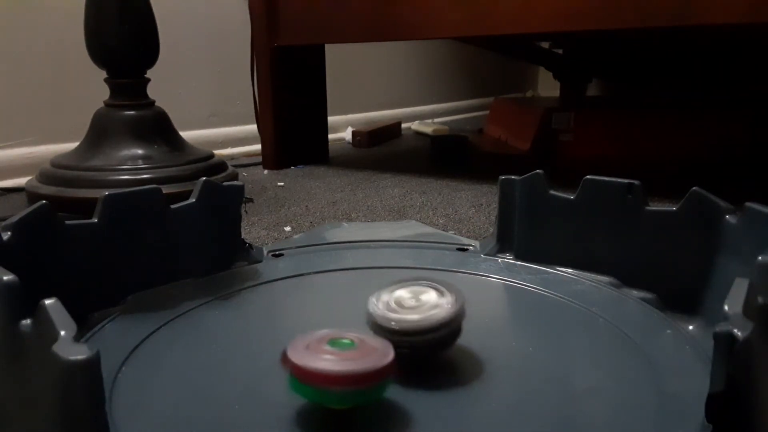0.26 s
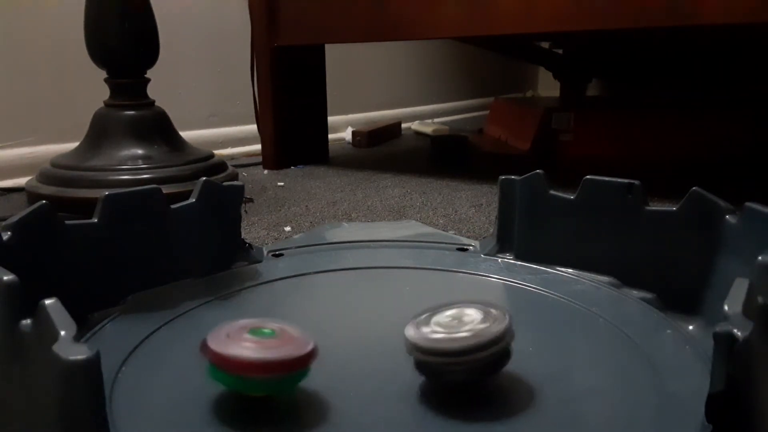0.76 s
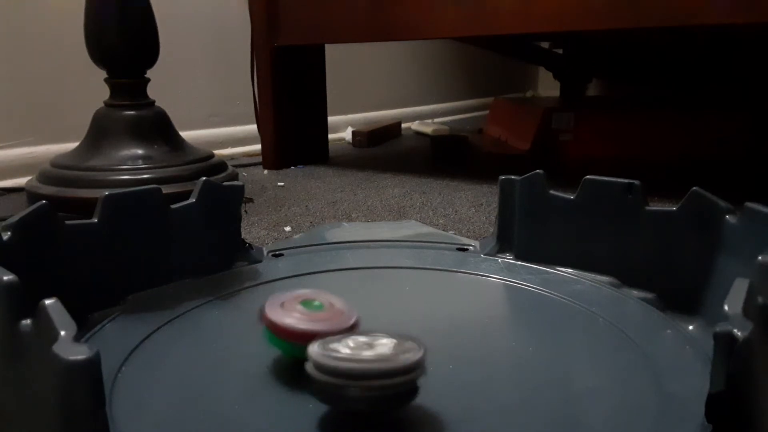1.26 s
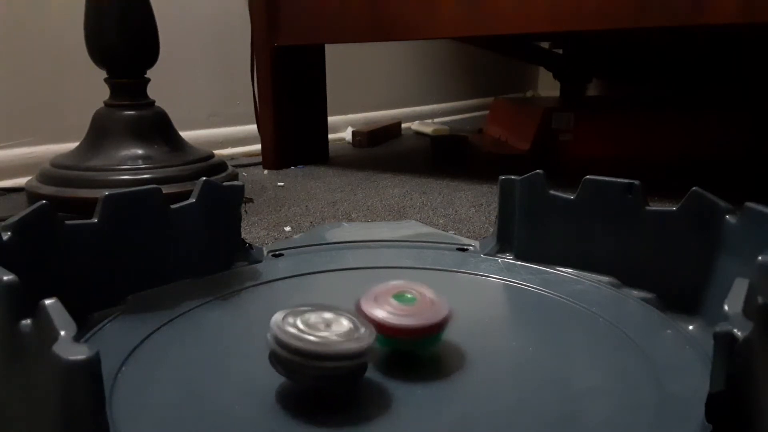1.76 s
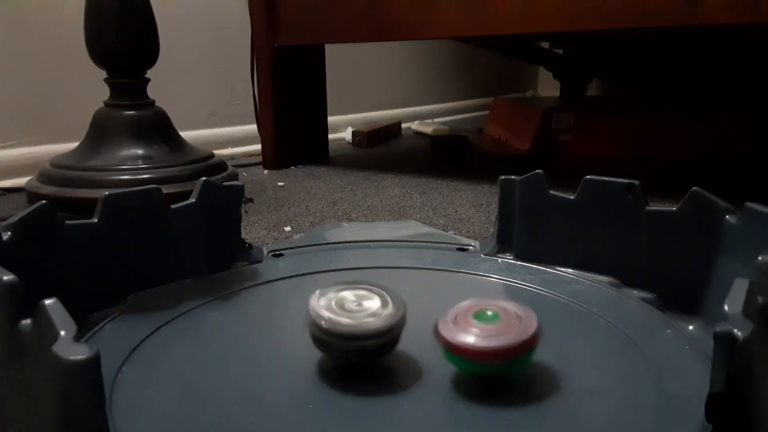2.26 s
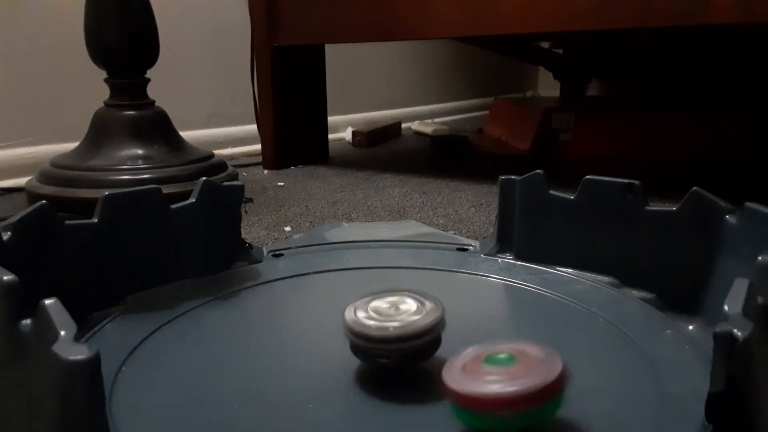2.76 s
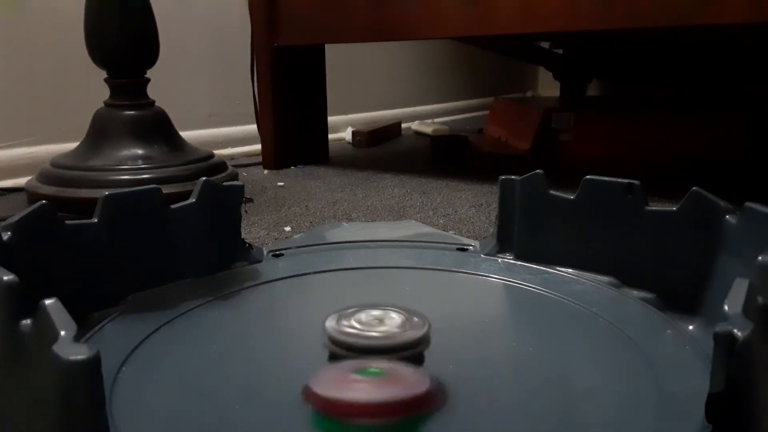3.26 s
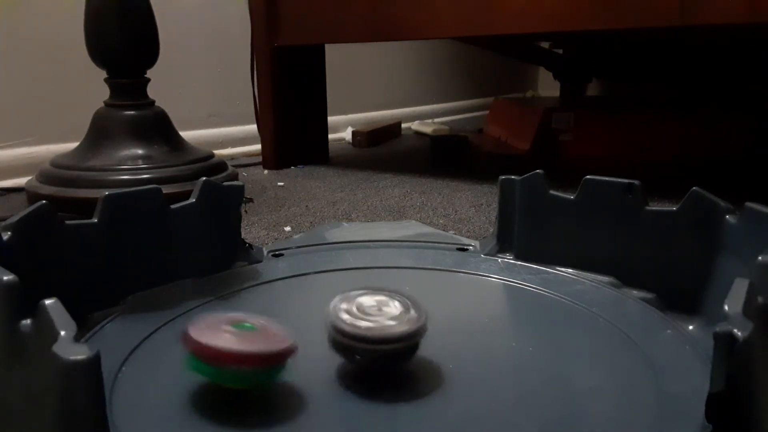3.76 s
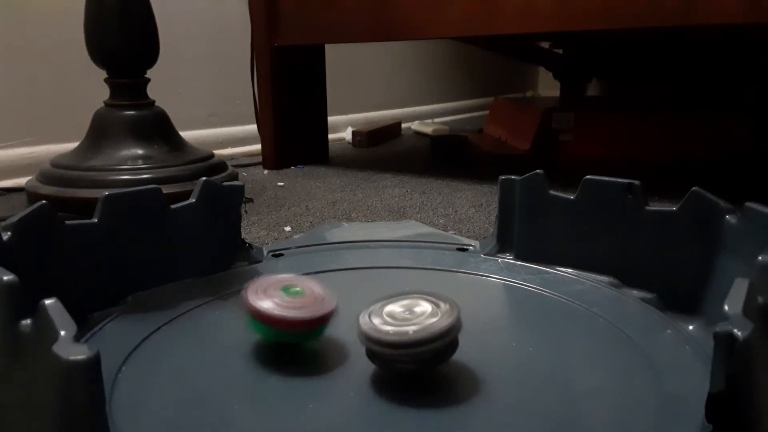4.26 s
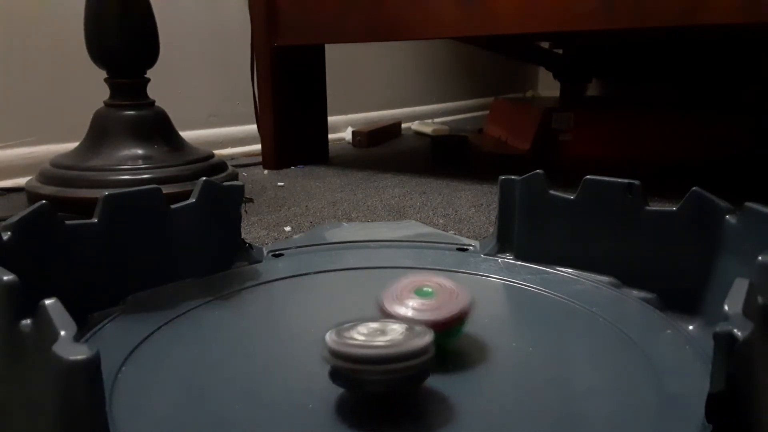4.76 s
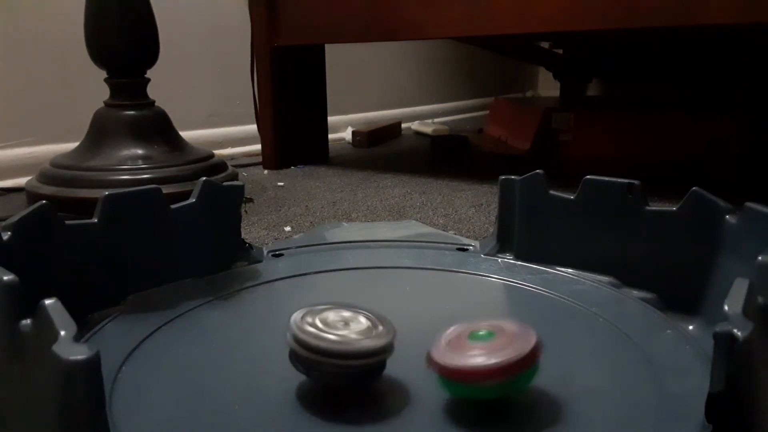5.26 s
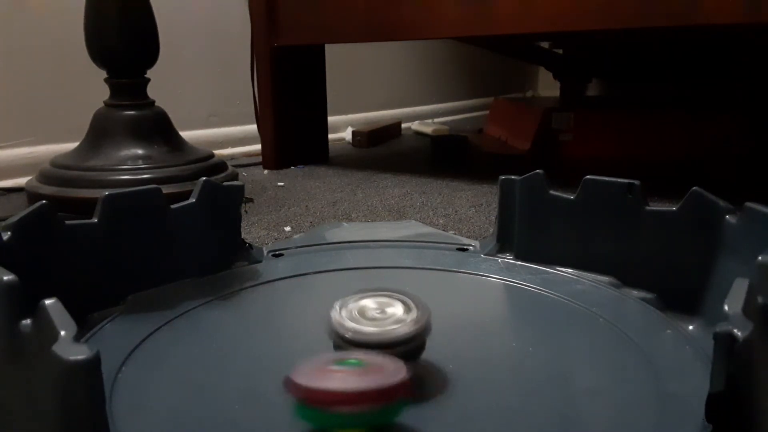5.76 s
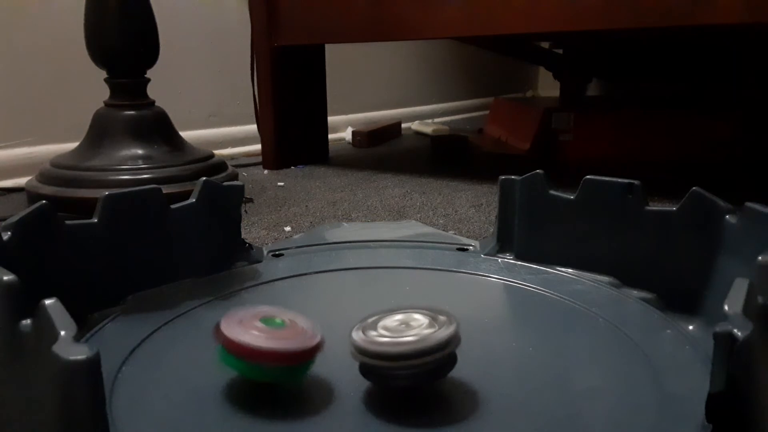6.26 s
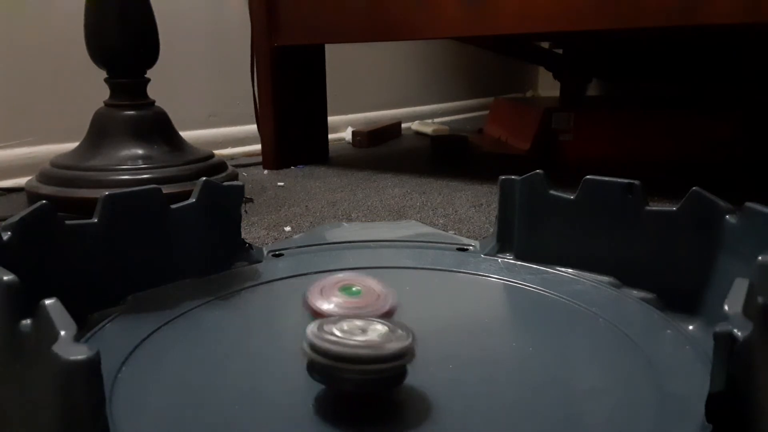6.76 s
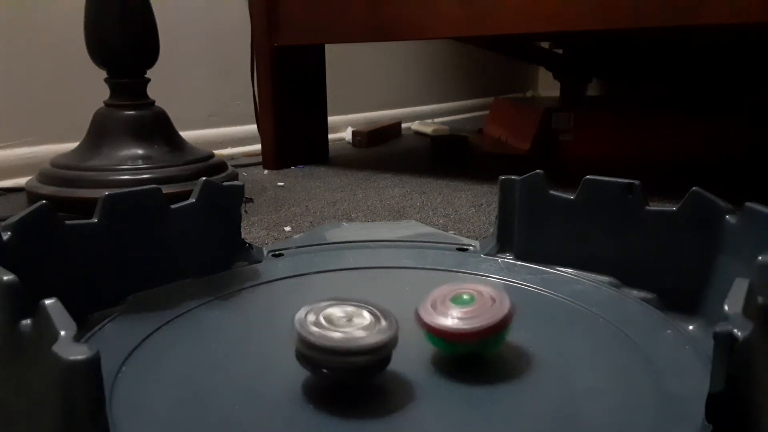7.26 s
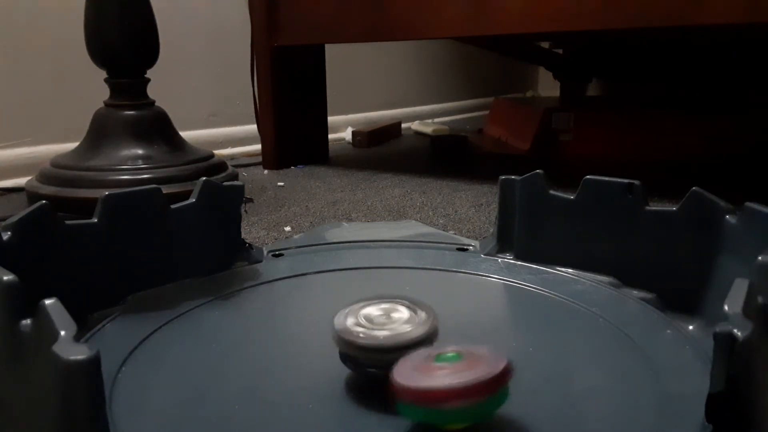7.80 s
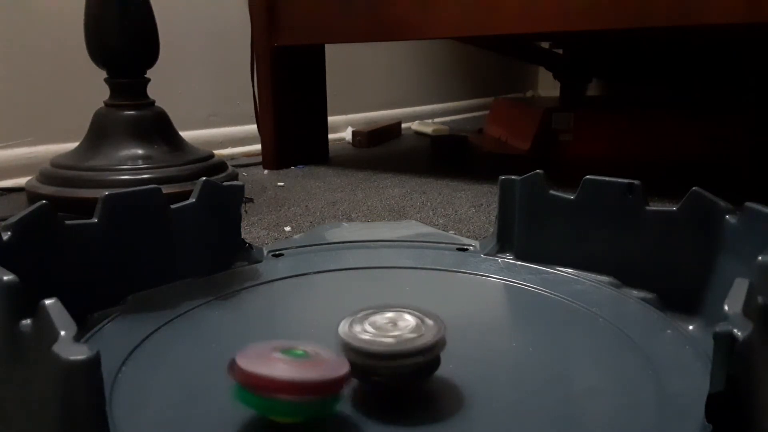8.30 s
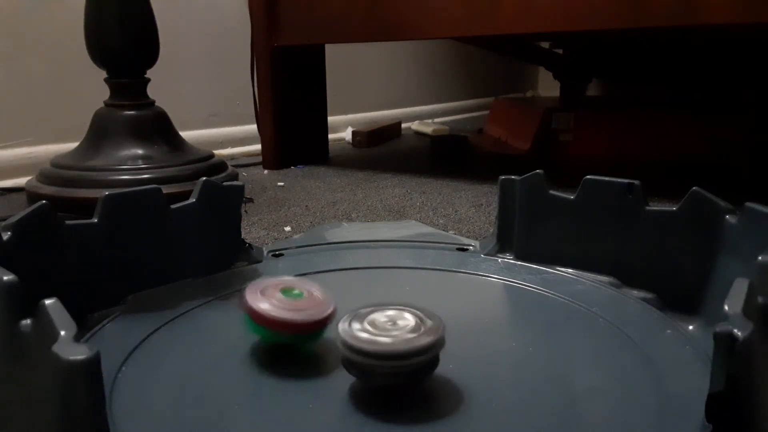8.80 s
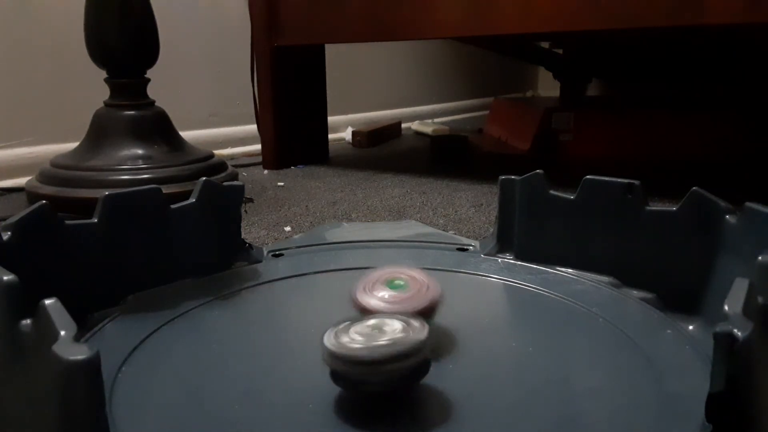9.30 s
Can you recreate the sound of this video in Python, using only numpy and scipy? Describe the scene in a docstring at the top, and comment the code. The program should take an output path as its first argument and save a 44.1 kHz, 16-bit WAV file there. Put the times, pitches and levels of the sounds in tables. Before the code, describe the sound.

Close-up hard plastic clacks between whirring tops, with a fast loose ticking and gritty scraping that gradually slows and grows uneven.

```python
"""A low rumble and hum are broken almost at once by a hard plastic clash: two tops spin in a thin plastic
bowl on a carpet, close to a phone with two microphone ports. Their tips scrape and knock the modes of the
bowl; a loose ring on one top ticks once or twice a turn as it slows; each clash is a burst of grinding
noise that rings the modes of the tops. A small furnished room answers ticks and clashes with one echo and
a short tail."""
import sys
import numpy as np
from scipy import signal
from scipy.fft import rfft, irfft, next_fast_len
from scipy.io import wavfile

SR = 44100
rng = np.random.default_rng(int(sys.argv[2]) if len(sys.argv) > 2 else 0)


def unload_audio(sound):
    """Save the sound as a 16-bit wav file, at the path given as the first command line argument."""
    columns = np.transpose(np.atleast_2d(sound))
    # keep every value between -1 and 1, then stretch to whole-number steps
    steps = np.round(np.clip(columns, -1, 1) * 32767)
    wavfile.write(sys.argv[1], SR, steps.astype(np.int16))


N = 420713  # samples

# Room and ports.
# Decay of the room. Each row: frequency in Hz, reverberation time in s.
ROOM_T60 = [(200, 0.32), (1400, 0.2), (3700, 0.17), (9700, 0.18), (16000, 0.12)]
ROOM_DB, ECHO_S, ECHO_DB = -8, 0.0145, -14.5
PORTS_HZ, PORTS_SHARE = 1380, 0.45  # the ports part above this; weight of the treble they still share
# The way round the phone to the right port turns the phase around this frequency.
SHADOW_HZ, SHADOW_WIDTH_HZ = 3400, 3400
TOP_HZ, HISS_DB = 16100, -64.5
# Relative spectrum of the hiss. Each row: frequency in Hz, density in dB per Hz.
HISS = [(40, 10.5), (300, -16), (1500, -10), (8000, -16), (16000, -16)]

# Jolts that reach the phone through the floor. Each row: time in s, relative level in dB.
JOLTS = [(0.1435, -34), (0.4944, -15.5)]
# Snaps before the rocking. Each row: lead in s, relative level in dB, share at the right port.
SNAPS = [(.0029, 6, -1), (.0013, 2, .6)]

# Hum of the steadier top through the bowl. Each row: time in s, mean level in dB.
HUM = [(0, -63.5), (3, -66.5), (6.4, -65), (7.5, -70), (9.1, -83), (9.54, -75)]
HUM_START_HZ, HUM_LIMIT_HZ, HUM_SLOWS_S = 71, 50, 8.7

# The leaning tip slides and keeps one mode of the slope sounding. Each row: time in s, level in dB.
SLIDE = [(0, -84), (7.68, -72), (7.75, -64), (7.81, -69), (7.86, -78), (8.15, -73), (8.299, -56),
         (8.6, -58.5), (8.9, -57), (9.0, -78), (9.54, -69)]
SLIDE_HZ, SLIDE_WIDTH_HZ = 572, 73
# For a while a narrow band of the scraping stands out. Each row: time in s, level in dB.
WHISTLE = [(0, -90), (3.2, -79), (3.5, -65), (4.0, -66.5), (4.5, -66), (5.0, -72), (5.4, -72), (9.54, -83)]
WHISTLE_HZ, WHISTLE_WIDTH_HZ = 2670, 340

# High on the slope the tip raps the wall once a turn. Each row: time in s, mean relative level in dB.
RAPS = [(0, -45.5), (5.35, -49), (5.5, -16), (6.1, -19.5), (6.6, -30), (6.85, -52), (7.55, -49),
        (7.68, -29), (8.1, -26), (8.45, -24.5), (8.8, -40), (9.54, -44)]
RAP_LAG_S, WALL_RUB_DB = 0.002, -25  # lag after the turn; rubbing between the raps
# Hollow ring of the wall. Each row: frequency in Hz, width in Hz, relative level in dB.
WALL = [(1600, 70, 0), (1185, 45, -15), (1450, 80, -12)]

# Modes of the bowl in five families, low to high: floor, dish, slope, wall, rim.
# Each row: frequency in Hz, width in Hz, relative level in dB.
BOWL = [
    [(66, 39, -3), (86, 35, -2)],
    [(120.8, 21.8, 0.5), (134.8, 17.8, 0.5), (159.5, 37.5, -2.5), (203.1, 23.5, 0), (284, 103, -7.5)],
    [(460, 94, -5), (550.5, 71, -0.5), (680, 116, -0.5)],
    [(1200, 120, 2.5), (1471, 94, 1.5), (1559, 138, 4)],
    [(2038, 65, 7), (2463, 840, -2.5), (2980, 1500, 4), (3810, 1700, 4.5)],
]
# The tips wander over the bowl. Each row: time in s, level of its floor, slope, wall and rim in dB.
TIPS = [(0.0, -59, -71, -92, -66.5), (0.42, -65.5, -66.5, -73, -72), (0.74, -62, -71.5, -74, -69),
        (0.87, -60.5, -66.5, -67, -57), (1.48, -63, -65.5, -68.5, -58), (1.8, -57.5, -54, -51, -45),
        (2.2, -59.5, -62.5, -80, -52.5), (2.55, -65.5, -59, -59.5, -53.5), (2.82, -55.5, -61.5, -59, -48.5),
        (3.45, -61.5, -60, -60, -59.5), (3.82, -66, -62.5, -71, -60), (4.36, -54.5, -58, -62, -54),
        (4.83, -58.5, -65.5, -65.5, -55.5), (5.37, -58.5, -59, -59.5, -50.5),
        (5.71, -49, -58.5, -54.5, -51.5), (6.06, -57.5, -59, -60, -56.5), (6.77, -53.5, -62.5, -62, -53.5),
        (7.15, -63.5, -64.5, -61.5, -57.5), (7.351, -64.5, -55.5, -62.5, -59), (7.57, -59, -61, -64, -53),
        (7.94, -61, -67.5, -62, -62), (8.5, -59.5, -52.5, -58, -58), (8.72, -53, -52.5, -54, -51.5),
        (8.95, -59, -64, -71, -59), (9.19, -54, -67.5, -76, -69), (9.54, -61.5, -61, -53, -52.5)]
DISH_DB = 2.5  # the dish follows the mean of floor and slope, plus this
# For each family: relative share of a blow in dB.
KICK_DB = [2.3, 2.3, 9.8, 3.7, 0.26]
# For each family: relative swing within a turn in dB.
KNOCK_DB = [1, 1.2, 3.6, 7, 8]
# For each family: smooth push of the unbalanced top against the grit under its tip, in dB.
THROB_DB = [-8, -8, -11, -18, -24]
# For each family: graininess of the scraping in dB.
SCRAPE_DB = [0, 2, 3.5, 4.5, 5.5]
KNOCK_SPREAD, LEAN_PER_S = 0.55, 0.006  # chance from turn to turn; the knock sharpens as the top leans

# Turn n of the slowing top falls at first + n turn + n n slowing, plus its lateness.
FIRST_TURN_S, TURN_S, SLOWING_S = 0.05, 0.01907, 2.376e-5
# Tilt and blows shift the slap against that law. Each row: turn number, lateness in ms.
LATE = [(1, -27.2), (32, -0.4), (68, 14.4), (81, 11.1), (84, 14.2), (91, 12.8), (136, -2.7), (142, 3.3),
        (148, -4.5), (152, -1.9), (159, -7.0), (167, -1.8), (180, -3.4), (189, 3.2), (196, 4.9),
        (217, -1.2), (226, 1.4), (263, -9.6), (281, -20.9), (301, -7.6), (315, -4.9), (326, 2.2),
        (334, 22.5), (337, 24.1), (342, 37.2), (346, 43.3)]

# The hardest blows ring the solid body where they land.
# Each row: time in s, relative level in dB, pitch of the struck spot in Hz, left minus right in dB.
CLACKS = [(0.14, -22, 593, 7), (0.145, -11.5, 2120, -5), (0.489, -14.5, 990, 3), (1.157, -31, 1550, 15),
          (1.993, -30, 1570, 6), (2.559, -21, 2350, 12), (3.131, -18.5, 2030, 3), (3.387, -17.5, 1530, 5),
          (3.409, -23, 2080, 4), (3.752, -21.5, 650, 9), (6.85, -27, 1160, 10), (7.01, -36.5, 1560, 8),
          (7.593, -37, 1160, 6.0), (7.59, -16, 1990, 2.0), (8.041, -46, 650, -1), (8.134, -32.5, 710, 9),
          (8.308, -33, 1460, 8), (8.503, -33, 1630, 1.0), (8.585, -42, 630, 5), (9.162, -25, 2390, 7),
          (9.193, -33, 594, -1), (0.1436, -17, 3860, 8), (0.468, -22, 3890, 8), (0.4912, -15, 5500, 1),
          (0.49, -17.5, 580, 3), (1.997, -29, 5300, 3), (2.539, -25, 4050, 0), (3.133, -20, 3780, 9),
          (3.731, -29, 4250, 2), (3.755, -13, 4200, -1), (7.59, -14, 3900, 10), (7.601, -26, 3470, 5),
          (8.134, -16, 4100, 3), (8.31, -20.5, 4170, 1), (8.503, -21, 3960, -4), (9.195, -22, 4450, 5)]
# Partials of the body. Each row: multiple of the pitch, relative level in dB.
CLACK_RATIOS = [(1, -0.5), (1.9, -5), (3.1, -19)]
CLACK_T60_S, CLACK_DB = 0.017, -3
CLACK_LAG_S = 0.001216  # the body answers just after the rims touch

# Crack of a top. Each row: frequency in Hz, relative density in dB per Hz.
TOP = [(1060, -18), (1800, -9), (2030, -11.5), (2330, -10.5), (4100, -3.5), (4880, -7), (7220, -2.5),
       (8670, 1), (9680, 0), (13600, 5), (16000, -6)]
# Modes of a top. Each row: frequency in Hz, relative level in dB, decay time to -60 dB in s.
TOP_MODES = [(1301, -18.5, 0.041), (2007, -15.5, 0.017), (2490, -19, 0.045), (5340, -19, 0.041),
             (2762, -20, 0.032), (4026, -9, 0.018), (6520, -18.5, 0.018), (8180, -4, 0.023),
             (10680, -6.5, 0.007), (13300, -32, 0.016)]
BRIGHT_HZ = 6140  # harder contact adds sound above this
GRIT_DB, GRIT_S = 4, 0.0003  # the grinding comes in uneven grains
# Each contact rings the modes in its own mix, and they drift with the tilt of the top.
STRIKE_DB, STRIKE_SPREAD_DB, STRIKE_DRIFT = -10, 6, 0.035
DAMPED_PER_DB = 0.3  # a harder blow presses longer and damps the ringing

# Blows between the tops and the hardest slaps of the ring. Each row: time in s, relative level in dB,
# share of the bowl in dB, relative brightness in dB, left minus right in dB.
BLOWS = [(0.1397, -9.5, -22, 14, 3), (0.145, -5, -58, 11, 0.5), (0.4691, -15, -39, 14, 5),
         (0.4899, -2, -28, 7, 0), (0.769, -31.5, -29, 13, 3), (0.8113, -27, -31, 6, 2),
         (0.8515, -28.5, -23.5, -8, 0), (1.157, -9, -29.5, 12.5, 0.5), (1.513, -25, -33, 13, 1),
         (1.9947, -5.5, -31, 17, 2.5), (2.156, -25, -40, 0, 2), (2.539, -14.5, -30, 5, 4),
         (2.5563, -16, -39, 9, -6), (2.5602, -12.5, -32, 11, -18.5), (2.5638, -21, -15, 11, 33),
         (2.758, -27, -24, 6, 3), (2.9799, -27.5, -37, -6, 2), (3.1312, -10, -20.5, 12, 7),
         (3.1364, -14.5, -49, 10, -13), (3.3874, -7, -25, 19.5, 5.5), (3.394, -16, -33, 7, -18),
         (3.409, -9, -53, 9, 1), (3.4118, -22, -47, 2, 13), (3.623, -30, -21, 0, 0),
         (3.73, -15, -34, 19, 1), (3.7537, -7, -29, 1, 4.5), (3.782, -21, -23, 20, -4),
         (3.949, -30, -35, 13, 1), (4.2903, -35, -16, 5, -4), (4.317, -38, -16, -8, 0),
         (4.342, -31.5, -17, 1, 1), (4.476, -31, -26, 1, 3), (5.076, -27.5, -36, 12, 3),
         (5.5972, -28.5, -13.5, 4, 1), (5.7527, -22.5, -41, 8, 3), (5.781, -24, -37, 14, 0),
         (6.528, -30, -16, -2, 3), (6.852, -7.5, -26, 15.5, 2), (6.8857, -15, -33, 14, 1),
         (7.01, -9, -27.5, 17.5, -1), (7.568, -36.5, -13, -4, 3), (7.5914, -6, -24, 13, 0),
         (7.6, -19, -25, -17, 1), (7.665, -42, -26, -3, 5), (7.73, -35, -24, -5, 1),
         (7.777, -38, -21, -5, 1), (7.8305, -36, -27.5, 4, 5), (7.844, -41, -28, 2, -1),
         (7.968, -40, -24, 10, 1), (8.101, -39, -28, 2, 3), (8.222, -40, -28, 11, 1), (8, -27, -27, 14, 1),
         (8.041, -19.5, -21, 16, 0.5), (8.1345, -7.5, -23, 19.5, 0.5), (8.239, -28.5, -32, 14, 1),
         (8.3082, -12.5, -38, 7, -0.5), (8.3754, -29.5, -24, -7, 1), (8.479, -29, -24, 5, 2),
         (8.5032, -15, -30, 5, 14.5), (8.5079, -13.5, -27.5, 10, -8), (8.5856, -11, -24, 16, 1.5),
         (8.739, -37, -13, 15, -3), (8.7732, -31, -23, -2, 2), (8.842, -38, -9.5, 10, -1),
         (8.982, -29, -12, 19, 1), (9.092, -39, -13, 4, 3), (9.1587, -22, -21, 4, 23),
         (9.163, -9.5, -31, 8, -4), (9.194, -8.5, -20.5, 8.5, 5.5), (9.352, -35.5, -34, -4, 2),
         (9.4235, -38, -13, -16, 2), (9.4992, -32, -16.5, 3, 2)]
LIGHT_DB = -22  # contacts below this scrape in more slowly
# While the tops circle close they touch lightly by chance. Each row: start in s, end in s.
GRAZE_SPANS_S = [(3.0, 3.72), (8.55, 9.1)]
GRAZE_DB, GRAZE_BOWL_DB = -42, -22  # mean level, mean share of the bowl
CHATTER_DB, CHATTER_S = -19, 0.045  # the ring chatters after a hard blow

# How the ring slaps. Each row: time in s, mean relative level in dB, relative brightness in dB.
RATTLE = [(0, -55, -13), (.15, -63, -5), (.62, -59, 7), (.76, -37.5, -9), (1.001, -32.5, 7), (1.11, -50, 2),
          (1.47, -33, 5), (1.78, -29, 1), (2.2, -37, -11), (2.33, -27.5, 1), (2.7, -36, -3), (2.9, -25, 3),
          (3.08, -38.5, -5), (3.3, -34.5, 1), (3.95, -39.5, -7), (4.15, -30, 12), (4.3, -36, 0),
          (4.5, -35, 8), (4.8, -33.5, -7), (4.93, -42, -21), (5.05, -33.5, -3), (5.5, -33.5, -12.5),
          (5.751, -28, 28.5), (6.0, -31.5, -6), (6.36, -33.5, -3), (6.6, -38, -5.5), (6.82, -41, 5),
          (7.1, -43.5, -18), (7.63, -42, -7), (7.75, -49, -16), (7.95, -55, -21), (8.2, -57, 0),
          (8.44, -31, 0), (8.87, -37, 0), (9.2, -56, -13), (9.54, -35, -2)]
WOBBLE_S, WOBBLE_ONSET_S = 5.4, 0.075  # around here the slowing top begins to wobble
# Rebound of each tick in dB, before and in the wobble.
REBOUND_DB = [-12, -8.5]
# For a while the ring slaps clearly twice a turn, the second slap creeping forward.
SECOND_S, SECOND_LASTS_S, SECOND_TURN, CREEP_TURNS_PER_S = 6.6, 0.3, 0.5, -0.3
# Second slap against the first in dB: usually, and in that while.
SECOND_DB = [-30, 0.5]
# Centres in Hz of the bands that swell and fade as the top tilts.
FACING_HZ = [1500, 2300, 2800, 3600, 4300, 5500, 8000, 11000, 14000]
FACING_DB = 2.8


def undb(db):
    """Amplitude ratio of a level in decibels."""
    return 10 ** (np.asarray(db, float) / 20)


def unit(x):
    """Scale to a root mean square of 1."""
    return x / np.sqrt(np.mean(x ** 2))


def on_log(table, hz):
    """Read a table of frequency and value along log frequency."""
    f, v = np.transpose(table)
    return np.interp(np.log(np.maximum(hz, 1)), np.log(f), v)


def colour(x, table):
    """Filter by a spectrum, scaled so that white noise keeps its power."""
    size = next_fast_len(N)
    gain = undb(on_log(table, np.fft.rfftfreq(size, 1 / SR)))
    return irfft(rfft(x, size) * unit(gain), size)[..., :N]


def ring(x, modes):
    """Modal superposition: resonances of alternating sign add up."""
    out = 0
    for k, (hz, width, db) in enumerate(modes):
        b, a = signal.iirpeak(hz, hz / width, SR)
        out = out + (-1) ** k * undb(db) * signal.lfilter(b, a, x)
    return out


def walk(rate):
    """Slow chance: straight lines between normal draws, rate of them a second."""
    knots = rng.standard_normal(int(N / SR * rate) + 2)
    return np.interp(np.arange(N) / SR * rate, np.arange(len(knots)), knots)


def port_noise():
    """Spatial coherence: noise much alike at both ports in the bass and less so in the treble."""
    low, high = [signal.butter(2, PORTS_HZ, kind, fs=SR, output="sos") for kind in ("low", "high")]
    bass = rng.standard_normal(N) + 0.3 * rng.standard_normal((2, N))
    common, own = rng.standard_normal(N), rng.standard_normal((2, N))
    treble = unit(PORTS_SHARE * common + (1 - PORTS_SHARE) * own)
    return signal.sosfilt(low, bass) + signal.sosfilt(high, treble)


def add_marks(s, gain):
    """Single-sample impulses at the given moments, for both ports."""
    marks = np.zeros((2, N))
    at = np.clip((s * SR).astype(int), 0, N - 1)
    np.add.at(marks, (slice(None), at), gain)
    return marks


def contact(s, db, rise_s, fall_s):
    """Contact force: an exponential rise and fall that peaks at each given moment."""
    t = np.arange(-SR // 150, SR // 30) / SR
    shape = np.exp(np.where(t < 0, t / rise_s, -t / fall_s))
    marks = add_marks(s, undb(db) * np.ones((2, 1)))
    return signal.oaconvolve(marks, shape[None])[:, np.sum(t < 0):][:, :N]


def spin():
    """Friction slows the top: each turn by the law takes steadily longer, and lateness shifts it."""
    turns = np.arange(348)
    law_s = FIRST_TURN_S + TURN_S * turns + SLOWING_S * turns ** 2
    return turns, law_s + np.interp(turns, *np.transpose(LATE)) / 1000


def room(near, around):
    """Reverberation: one hard wall nearby, then a dense tail whose treble mostly dies sooner."""
    t = np.arange(SR // 2) / SR
    noise, tail = rng.standard_normal((2, len(t))), 0
    for hz in 100 * 2. ** np.arange(8):  # octave bands
        band = signal.butter(2, [hz / 2 ** .5, hz * 2 ** .5], "band", fs=SR, output="sos")
        tail = tail + signal.sosfilt(band, noise) * undb(-60 * t / on_log(ROOM_T60, hz))
    tail = tail * (1 - np.exp(-(t / 0.014) ** 2))  # the first walls take a while to answer
    tail = tail * undb(3.5 * walk(250)[:len(t)])  # single reflections stand out
    tail = undb(ROOM_DB) * tail / np.sqrt(np.sum(tail ** 2, axis=1, keepdims=True))
    echo = undb(ECHO_DB) * np.roll(near, int(ECHO_S * SR), axis=1)
    return echo + signal.oaconvolve(around, tail, axes=1)[:, :N]


def jolts(end_hz=55, extra_hz=50, t60=0.1, right=-0.62, width_s=0.00045):
    """Damped oscillation: the phone snaps, then rocks ever slower, its ports moving against each other."""
    out = np.zeros((2, N))
    t = np.arange(-SR // 100, SR // 4) / SR
    pitch = (end_hz + extra_hz * np.exp(-t / 0.0065)) * (t > 0)
    swing = np.sin(2 * np.pi * np.cumsum(pitch) / SR) * undb(-60 * t / t60)
    rock = np.outer([1, right], swing)
    for lead_s, db, share in SNAPS:
        snap = undb(db) * np.exp(-((t + lead_s) / width_s) ** 2)
        rock = rock - np.outer([1, share], snap)
    for s, db in JOLTS:
        i = int(s * SR) - SR // 100
        out[:, i:i + len(t)] += undb(db) * rock
    return out


def hum():
    """Forced vibration: a slight unbalance shakes the bowl once a turn; the contact wavers."""
    t = np.arange(N) / SR
    hz = HUM_LIMIT_HZ + (HUM_START_HZ - HUM_LIMIT_HZ) * np.exp(-t / HUM_SLOWS_S)
    db = np.interp(t, *np.transpose(HUM)) + 2 * walk(4.5)
    phase = 2 * np.pi * np.cumsum(hz + 1.1 * walk(16.0)) / SR
    return np.sqrt(2) * undb(db) * np.sin(phase)


def slide(curve, hz, width_hz):
    """Resonance under friction: smooth rubbing noise passes twice through one mode."""
    mode = [(hz, width_hz, 0)]
    tone = unit(ring(ring(port_noise(), mode), mode))
    return tone * undb(np.interp(np.arange(N) / SR, *np.transpose(curve)))


def raps():
    """Impact excitation: short raps, and the rubbing between them, ring the hollow wall."""
    at = spin()[1] + RAP_LAG_S
    db = np.interp(at, *np.transpose(RAPS)) + 4.1 * rng.standard_normal(len(at))
    at, db = np.append(at, at + 0.0087), np.append(db, db - 6.0)  # each rap bounces once
    rub = undb(WALL_RUB_DB + np.interp(np.arange(N) / SR, *np.transpose(RAPS)))
    force = contact(at, db, 0.00045, 0.00073) + rub
    return ring(force * port_noise(), WALL)


def tips():
    """Rolling contact: the tips scrape the bowl's modes; the unbalanced top knocks down once a turn."""
    s, floor_db, slope_db, wall_db, rim_db = np.transpose(TIPS)
    dish_db = (floor_db + slope_db) / 2 + DISH_DB
    levels = floor_db, dish_db, slope_db, wall_db, rim_db
    t = np.arange(N) / SR
    turns, at = spin()
    phase = np.interp(t, at + 0.0025, turns)  # in turns
    chance = rng.standard_normal(N // 400)[np.round(phase).astype(int)]
    knock = np.cos(2 * np.pi * phase) * (0.58 + LEAN_PER_S * t) * (1 + KNOCK_SPREAD * chance)
    # the push repeats every turn, so the low modes hum on multiples of the spin rate
    throb = np.exp(14 * (np.cos(2 * np.pi * phase) - 1))
    rough, grains, out = port_noise(), walk(400), 0
    for modes, db, swing_db, throb_db, grain_db in zip(BOWL, levels, KNOCK_DB, THROB_DB, SCRAPE_DB):
        push = undb(swing_db * knock + grain_db * grains) * rough + undb(throb_db) * throb
        family = 0
        for hz, width, mode_db in modes:
            # plate and trapped air sharpen each mode
            sharp = ring(ring(push, [(hz, width, 0)]), [(hz, width, mode_db)])
            # its share drifts as the tips move across its nodes
            family = family + undb(2.82 * walk(4.5)) * sharp
        out = out + unit(family) * undb(np.interp(t, s, db))
    return out


def clacks():
    """Free vibration: each hard blow sets off a few quickly dying modes."""
    out, t = np.zeros((2, N)), np.arange(SR // 25) / SR
    for s, db, hz, pan_db in CLACKS:
        body = sum(undb(mode_db) * np.sin(2 * np.pi * ratio * hz * t) for ratio, mode_db in CLACK_RATIOS)
        gain = undb(db + CLACK_DB + np.array([[pan_db], [-pan_db]]) / 2)
        i = int((s + CLACK_LAG_S) * SR)
        out[:, i:i + len(t)] += gain * body * undb(-60 * t / CLACK_T60_S)
    return out


def strike(s, db):
    """Modal excitation: every contact rings each mode of the top with its own strength."""
    chance = rng.standard_normal((len(s), len(TOP_MODES))).T
    mix_db = STRIKE_SPREAD_DB * np.clip(chance, -3, 1.5)
    db = db - DAMPED_PER_DB * np.maximum(db + 30, 0)
    out = 0
    for (hz, mode_db, t60), own_db in zip(TOP_MODES, mix_db):
        marks = add_marks(s, undb(db + STRIKE_DB + mode_db + own_db))
        decay = signal.lfilter([1], [1, -undb(-60 / (t60 * SR))], marks)
        turns = np.cumsum(hz * (1 + STRIKE_DRIFT * walk(25))) / SR + rng.random((2, 1))
        out = out + decay * np.sin(2 * np.pi * turns)
    return out


def crack(s, db, bright_db, rise_s, fall_s):
    """Grinding rims ring the top: the sound towards the ports, and the sum over all directions for the room."""
    modes = [(hz, np.log(1000) / (np.pi * t60), mode_db) for hz, mode_db, t60 in TOP_MODES]
    rough = port_noise() * unit(undb(GRIT_DB * walk(1 / GRIT_S)))
    same_energy = np.sqrt(SR * (rise_s + fall_s) / 2)
    out = 0
    for kind, tilt_db in (("low", 0.5 - bright_db / 2), ("high", bright_db / 2 - 11.5)):
        near = contact(s, db + tilt_db, rise_s, fall_s) * rough
        # over all directions the colour is even: close to a single impulse
        around = contact(s, db + tilt_db, .1 / SR, .1 / SR) * same_energy
        sos = signal.butter(2, BRIGHT_HZ, kind, fs=SR, output="sos")
        out = -out + signal.sosfilt(sos, [near, around])  # opposite signs join without a notch
    ringing = undb(6.5) * ring(out, modes)
    return colour(out, TOP) + ringing + np.multiply.outer([1, .4], strike(s, db))


def grazes(count=9):
    """Light chance contacts in each span, as rows like those of the blows."""
    s = np.concatenate([rng.uniform(start, end, count) for start, end in GRAZE_SPANS_S])
    spread = rng.standard_normal((len(s), 4)) * [2.5, 3, 6, 3]
    return np.column_stack([s, spread + [GRAZE_DB, GRAZE_BOWL_DB, 0, 1]])


def chatter(count=3):
    """Repeated impact: fading contacts soon after each hard blow, as rows like those of the blows."""
    hard = np.repeat([row for row in BLOWS if row[1] > LIGHT_DB], count, axis=0)
    chance = rng.random((len(hard), 3)).T
    lag = .012 - CHATTER_S * np.log(1 - chance[0])
    db = hard[:, 1] + CHATTER_DB - 150 * lag + 8 * (chance[1] - .5)
    bright_db = 16 * (chance[2] - .5)
    return np.column_stack([hard[:, 0] + lag, db, 0 * db - 30, bright_db, 0 * db + 1])


def blows():
    """Collision: each blow cracks the tops and kicks the bowl through their tips."""
    s, db, bowl_db, bright_db, pan_db = np.vstack([BLOWS, grazes(), chatter()]).T
    hard, sides_db = db > LIGHT_DB, db + np.outer([1, -1], pan_db) / 2
    rims = 0
    for k, rise_s, fall_s in ((hard, 0.00063, 0.0024), (~hard, 0.0013, 0.0019)):
        rims = rims + crack(s[k], sides_db[:, k], bright_db[k], rise_s, fall_s)
    kick = contact(s, db + bowl_db, 0.00052, 0.012) * port_noise()
    bowl = sum(undb(4.5 + share_db) * ring(kick, modes) for modes, share_db in zip(BOWL, KICK_DB))
    return rims + bowl


def facing(x):
    """Directivity: the tilting top shows the phone ever other sides, so its colour wanders."""
    out = x
    for hz in FACING_HZ:
        out = out + (undb(FACING_DB * walk(22.0)) - 1) * ring(x, [(hz, 0.18 * hz, 0)])
    return out


def loose_ring():
    """Periodic impact: the ring slaps a little unevenly and rebounds; a blow takes the place of a slap."""
    first = spin()[1]
    count = len(first)
    twice = np.exp(-((first - SECOND_S) / SECOND_LASTS_S) ** 4)
    part = SECOND_TURN + CREEP_TURNS_PER_S * (first - SECOND_S) * twice
    at = np.append(first, first + part * np.gradient(first))
    s, *columns = np.transpose(RATTLE)
    db, bright_db = (np.interp(at, s, c) for c in columns)
    wobble = .5 + .5 * np.tanh((at - WOBBLE_S) / WOBBLE_ONSET_S)
    sample = np.minimum(at * SR, N - 1).astype(int)
    second_drift, rebound_drift = [walk(7.5)[sample] for _ in range(2)]
    chance = rng.standard_normal((len(at), 6)).T
    db = db + 1.9 * chance[0]
    db[count:] += np.interp(twice, [0, 1], SECOND_DB) + (5.5 + 5.8 * (1 - twice)) * second_drift[count:]
    to_blow_s = np.abs(at[:, None] - np.array(BLOWS)[:, 0]).min(axis=1)
    db[to_blow_s < .006] = -99
    at = at + 0.00065 * chance[1]
    at = np.append(at, at + 0.0086 + 0.0031 * chance[2])  # slaps, then their rebounds
    rebound_db = np.interp(wobble, [0, 1], REBOUND_DB) + 1.6 * rebound_drift + 1.2 * chance[3]
    pan_db = np.outer([1, -1], np.tile(0.96 + .5 * chance[4], 2))
    db = np.append(db, db + rebound_db) + pan_db
    return crack(at, db, np.tile(bright_db + 2.5 * chance[5], 2), .0015, .0022)


def scene():
    """Superposition: ticks and clashes sound direct and through the room; the other sources only direct."""
    ticks, clashes = facing(loose_ring()), blows()
    near, around = 0, 1
    # the bowl's wall screens the low, quiet ticks from the room more than the blows
    to_room = undb(-6.5) * ticks + clashes
    out = ticks[near] + clashes[near] + room(to_room[near], to_room[around])
    out = out + clacks() + tips() + raps()
    out = out + slide(SLIDE, SLIDE_HZ, SLIDE_WIDTH_HZ) + slide(WHISTLE, WHISTLE_HZ, WHISTLE_WIDTH_HZ)
    return out + hum() + jolts()


def record(dry):
    """Transduction: air and microphone hiss, rounded peaks, weak deep bass and a steep cut at the top."""
    x = dry + undb(HISS_DB) * colour(rng.standard_normal((2, N)), HISS)
    notch, poles = signal.iirnotch(SHADOW_HZ, SHADOW_HZ / SHADOW_WIDTH_HZ, SR)
    x = np.array([x[0], signal.lfilter(2 * notch - poles, poles, x[1])])  # all-pass
    drive = 1.5
    x = np.tanh(drive * x) / drive
    x = signal.sosfilt(signal.butter(2, 50, "high", fs=SR, output="sos"), x)
    return signal.sosfilt(signal.ellip(8, .5, 70, TOP_HZ, fs=SR, output="sos"), x)


dry = scene()
out = record(dry)
unload_audio(out)
```